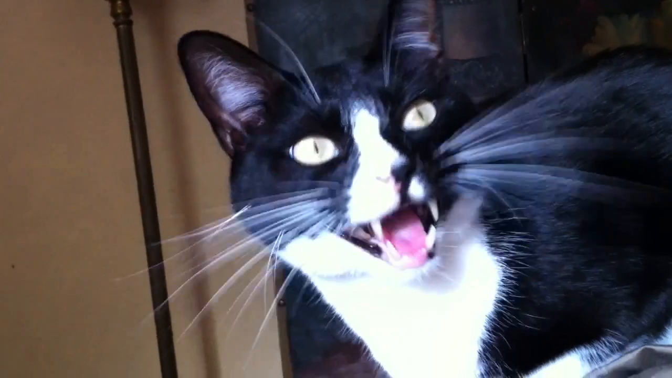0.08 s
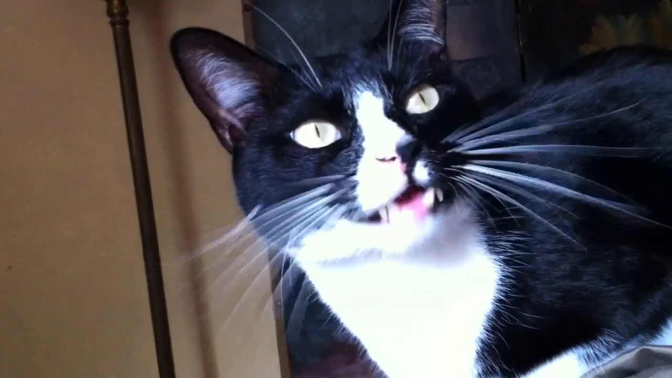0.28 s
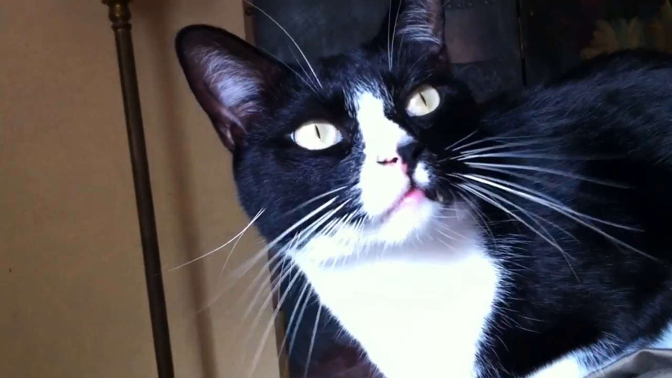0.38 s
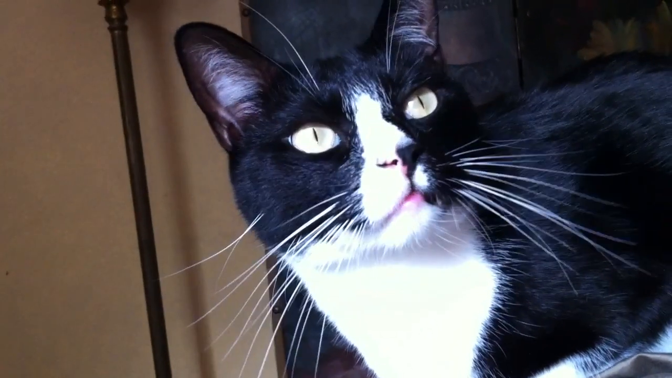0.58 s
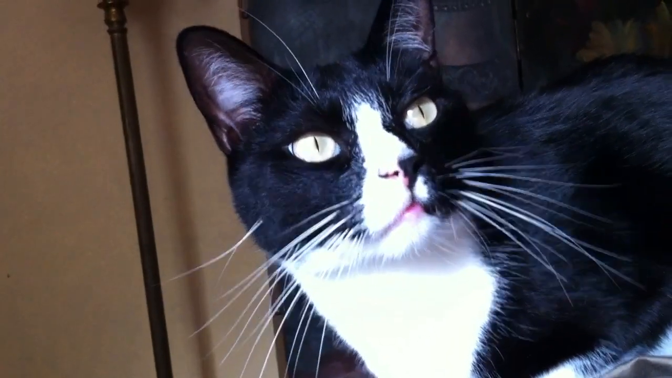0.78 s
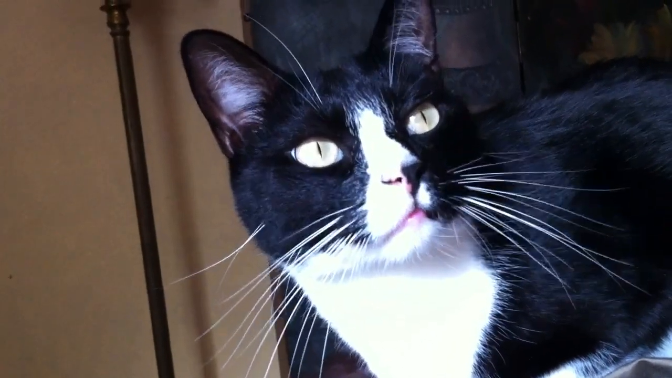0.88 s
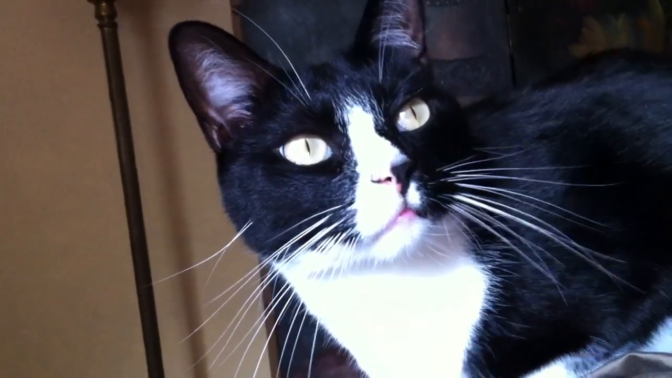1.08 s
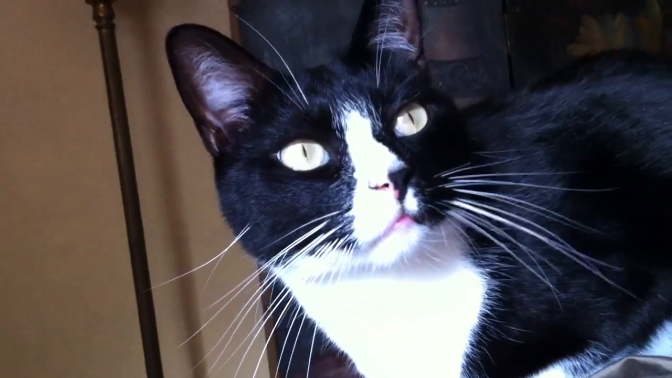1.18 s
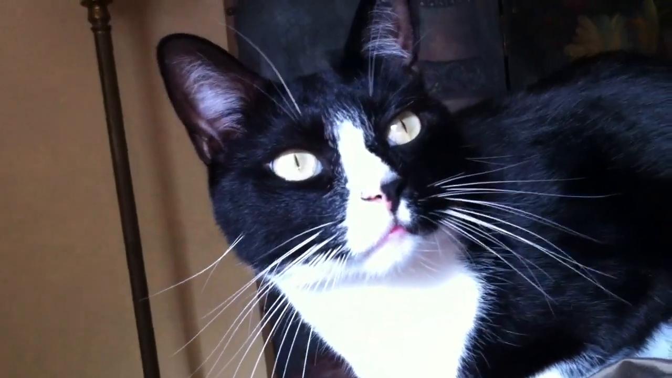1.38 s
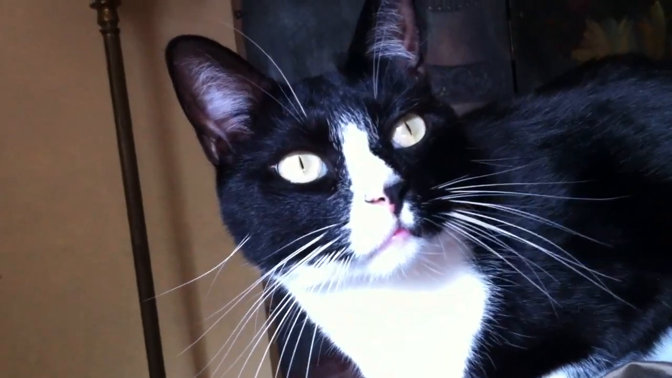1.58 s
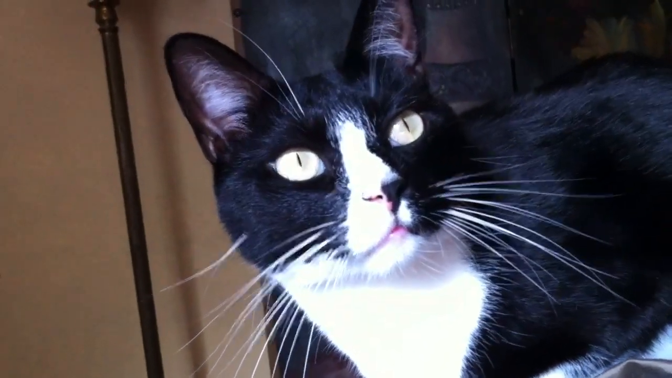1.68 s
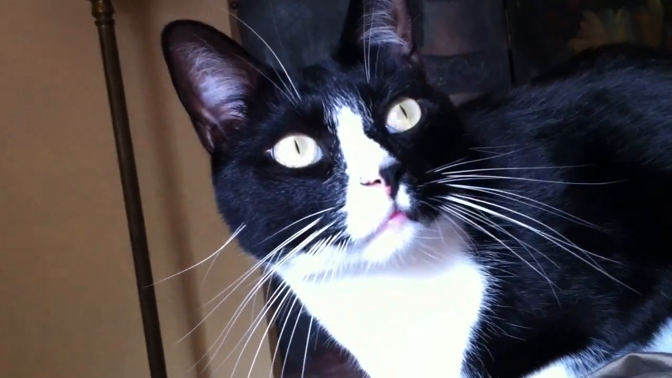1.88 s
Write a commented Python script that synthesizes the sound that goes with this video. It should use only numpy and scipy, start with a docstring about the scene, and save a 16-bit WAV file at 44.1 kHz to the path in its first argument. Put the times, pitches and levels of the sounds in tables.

```python
"""A faint steady hum and hiss come first; then a cat close by in a small quiet room gives one meow.
The meow is a sum of harmonics on one pitch: a squeaky start, a bright open cry with doubled cycles shaped
by throat resonances, a rasp as the jaw closes, then a thin wavering coo. Bursts of coloured noise make
the gurgles and a lip smack. A tiny rising squeak follows, a short glide of one line. Last comes a soft
purr: regular beats that ring decaying chest modes over a low noise rumble."""
import sys
import numpy as np
from scipy import signal
from scipy.fft import rfft, irfft
from scipy.io import wavfile

SR = 44100
rng = np.random.default_rng(int(sys.argv[2]) if len(sys.argv) > 2 else 0)


def transcribe(signal):
    """Save signal, clipped to [-1, 1], as a 16-bit WAV file at the path in sys.argv[1]."""
    frames = np.atleast_2d(signal).T
    limited = np.clip(frames, -1, 1)
    pcm = np.round(limited * 32767).astype(np.int16)
    wavfile.write(sys.argv[1], SR, pcm)


N = 83790
T = np.arange(N) / SR   # time, s


def from_db(db):
    """A level in decibels is twenty times the logarithm of the amplitude ratio returned here."""
    return 10 ** (np.asarray(db) / 20)


def rms_one(x):
    """Division by the root mean square gives a signal unit power."""
    return x / np.sqrt(np.mean(np.abs(x) ** 2) + 1e-20)


def in_time(rows):
    """Linear interpolation turns each column after the times into a curve through time."""
    times, *columns = np.transpose(rows)
    return [np.interp(T, np.sort(times), column) for column in columns]


def drift(hz):
    """White noise through a two-pole low-pass wanders at about this rate, with unit power."""
    pole = np.exp(-2 * np.pi * hz / SR)
    white = rng.standard_normal(2 * N)
    wander = signal.lfilter([1], [1, -2 * pole, pole * pole], white)
    return rms_one(wander[N:])   # the first half lets the filter settle


def noise(spectrum):
    """Spectral shaping of white noise: levels run straight over log frequency, at unit power overall."""
    hz, db = np.transpose(spectrum)
    log_hz = np.log(np.fft.rfftfreq(N, 1 / SR) + 1)
    gain = from_db(np.interp(log_hz, np.log(hz), db))
    return rms_one(irfft(rfft(rng.standard_normal(N)) * gain, N))


def partial(phase, rough):
    """Turbulence modulates a line's amplitude and phase at random, which spreads it into sidebands."""
    fray_rate_hz = 113
    fray = drift(fray_rate_hz) + 1j * drift(fray_rate_hz)
    return np.exp(1j * phase) * (1 + rough * fray) / np.sqrt(1 + 2 * rough ** 2)


def background(waver_hz=7):
    """Random modulation makes a pure hum waver; broadband noise adds the room noise and hiss."""
    hum_hz, hum_db, hum_waver = 261.5, -69.5, 0.25
    floor_db = -65
    # room noise and hiss: f/Hz, relative spectral density/dB
    floor_spectrum = [(25, 0), (45, -10), (65, -9), (95, -14), (125, -5), (190, -6.5), (290, 1),
                      (400, -7.5), (700, -10), (1100, -12), (1800, -13.5), (4000, -16), (8000, -18.5),
                      (15500, -20)]
    waver = 1 + hum_waver * (drift(waver_hz) + 1j * drift(waver_hz))
    hum = (np.exp(2j * np.pi * hum_hz * T) * waver).real
    return from_db(hum_db) * rms_one(hum) + from_db(floor_db) * noise(floor_spectrum)


def purr(uneven_db=5.0):
    """Impulse excitation: regular beats set off decaying chest modes over a swelling rumble."""
    start_s, period_s = 1.467, 0.053
    rumble_db = -68.5   # before the swell
    # swell of the whole purr: t/s, gain/dB
    swell = [(.9, -18), (1.15, -0.5), (1.4, -7), (1.47, -5.5), (1.55, 4), (1.63, 1), (1.71, 2.5), (1.76, 2),
             (1.83, 2), (1.9, 2)]
    # chest modes: f/Hz, mean level before the swell/dB, decay time to -60 dB/s
    chest_modes = [(128, -66, 0.16), (202, -63.5, 0.02), (320, -61, 0.0166), (470, -68, 0.016)]
    # rumble: f/Hz, relative level/dB
    rumble_spectrum = [(50, -35), (100, -19), (124, 6.5), (145, -3), (200, -4), (330, -7.5), (550, -19),
                       (1200, -44), (3000, -41)]
    swell_db, = in_time(swell)
    beats = np.zeros(N)
    for beat_s in np.arange(start_s, T[-1], period_s):
        age = np.maximum(T - beat_s, 0)
        for hz, level_db, t60 in chest_modes:
            decay_db = 60 * np.minimum(age / t60, 2)
            strike_db = level_db + uneven_db * rng.standard_normal()
            beats += from_db(strike_db - decay_db) * np.sin(2 * np.pi * hz * age)
    return from_db(swell_db) * (beats + from_db(rumble_db) * noise(rumble_spectrum))


def squeak():
    """Linear frequency glide: a phase quadratic in time gives a tiny rising after-sound."""
    centre_s, length_s, level_db = 1.04, 0.051, -68   # length: half-width to 1/e
    centre_hz, rise_hz_per_s = 792, 4400
    age = T - centre_s
    phase = 2 * np.pi * (centre_hz + rise_hz_per_s * age / 2) * age
    envelope = np.exp(-(age / length_s) ** 2)
    return from_db(level_db) * envelope * partial(phase, rough=.5).real


def mouth_noises():
    """Turbulent flow: enveloped noises form the throat's air rush, short gurgles and a lip smack."""
    smack_s, smack_decay_s, smack_db = .8605, 0.0047, -48.5   # decay to 1/e; level at onset
    # air rushing through the throat: t/s, level/dB
    air_levels = [(.42, -90), (.46, -63), (.53, -65), (.61, -76), (.68, -63), (.72, -61.5), (.78, -63.5),
                  (.85, -62.5), (.9, -71), (1.0, -78.5), (1.12, -90)]
    # colour of the air rush: f/Hz, relative level/dB
    air_spectrum = [(100, -38), (500, -18.5), (900, 0), (1200, -8), (1450, -1.5), (1750, -9), (2100, -3),
                    (2900, -19.5), (5000, -16.5), (8000, -22)]
    # gurgles in the throat: centre t/s, half-width to 1/e^2/s, peak level/dB
    gurgle_bursts = [(0.662, 0.0086, -56), (0.801, .008, -52.5), (0.818, 0.016, -58), (0.845, 0.016, -55)]
    # colour of the gurgles: f/Hz, relative level/dB
    gurgle_spectrum = [(100, -24), (330, -6.5), (550, -17), (850, 0.5), (1000, -0.5), (1250, -27),
                       (2400, -37), (5000, -25), (9000, -42)]
    # colour of the smack: f/Hz, relative level/dB
    smack_spectrum = [(100, -30), (300, -7), (1400, -12), (2450, 7), (3000, -33), (3700, 3.5), (4300, -14),
                      (5200, 4), (7000, -17), (12000, -30)]
    air_db, = in_time(air_levels)
    air = from_db(air_db) * noise(air_spectrum)
    bursts = sum(from_db(db) * np.exp(-2 * ((T - s) / length) ** 2) for s, length, db in gurgle_bursts)
    gurgles = bursts * noise(gurgle_spectrum)
    smack_decay = (T > smack_s) * np.exp(-np.abs(T - smack_s) / smack_decay_s)
    smack = from_db(smack_db) * smack_decay * noise(smack_spectrum)
    return air + gurgles + smack


def coo(phase, fray_per_harmonic=0.93):
    """Harmonic series: a nearly pure tone through the nearly shut mouth, with weak, frayed overtones."""
    second_boost_db, boost_fade_s, boost_start_s = 11.5, 0.029, 0.505
    treble_fade_start_s, treble_fade_db_per_s = 0.64, 88
    # the whole coo: t/s, level/dB, roughness of the first harmonic (0-1)
    course = [(.46, -68, 0.1), (.49, -50, 0), (.535, -50, 0.13), (.616, -48.5, 0), (.636, -52.5, 0.15),
              (.668, -49.5, .08), (.684, -55, 0.1), (.71, -52, 0.17), (.752, -52.5, 0.13), (.768, -56, .15),
              (.79, -58, 0.2), (.803, -67, .6), (.826, -50.5, 0.4), (.84, -71, 0.82), (.853, -54, 0.8),
              (.868, -88, 0.56)]
    # harmonics from the first up: relative level/dB
    harmonics_db = [0.5, -13, -20.5, -27.5, -28, -26, -18.5, -27, -28]
    # weak line between harmonics one and two: t/s, relative level/dB
    half_line = [(.5, -27), (.54, -9.5), (.59, -25), (.7, -28), (.79, -21), (.85, -5)]
    db, rough = in_time(course)
    half_db, = in_time(half_line)
    # as the effort wanes, the fourth harmonic and up fade
    waning = from_db(-treble_fade_db_per_s * np.maximum(T - treble_fade_start_s, 0))
    sizes = [from_db(level) * (waning if k > 2 else 1) for k, level in enumerate(harmonics_db)]
    # the closing mouth still lifts the second harmonic
    boost = np.exp(-np.maximum(T - boost_start_s, 0) / boost_fade_s)
    sizes[1] = sizes[1] * from_db(second_boost_db * boost)
    out = 0
    for k, size in enumerate(sizes):
        out = out + size * partial((k + 1) * phase, rough * (1 + fray_per_harmonic * k)).real
    out = out + from_db(half_db) * partial(phase + phase / 2, rough=0.81).real
    power = sum(size ** 2 for size in sizes) / 2
    return from_db(db) * out / np.sqrt(power)


def flutter(uneven=0.24):
    """Amplitude modulation: uneven beats of the vocal folds rasp the voice as the jaw closes."""
    centre_s, length_s, mean_hz, depth = 0.45, 0.032, 78.3, 0.33
    beat_hz = mean_hz * (1 + uneven * drift(mean_hz))
    beat = np.cos(2 * np.pi * np.cumsum(beat_hz) / SR)
    return 1 + depth * np.exp(-((T - centre_s) / length_s) ** 4) * beat


def cry(pitch, phase, low_cut_hz=480, fray_hz=3000):
    """Period doubling puts lines at half the pitch; source-filter resonances sink as the jaw closes."""
    # the open cry: t/s, level/dB, relative strength of the half-pitch lines (0-1),
    # roughness at low frequency (0-1)
    course = [(.195, -80, .1, .3), (.199, -44, 0.1, 0.1), (.214, -47.5, 0.2, .12), (.223, -42.5, 0.2, 0.17),
              (.244, -46, 0.3, 0.3), (.248, -35.5, 0.54, 0.14), (.255, -32, 1, 0.12), (.26, -34, 0.97, 0.2),
              (.28, -36, 0.93, 0.13), (.345, -35.5, 0.9, 0.09), (.385, -40, 0.92, 0.09),
              (.405, -37.5, 1, 0.1), (.425, -43.5, 1, 0.16), (.435, -41.5, 0.99, 0.4),
              (.483, -49.5, 0.99, 0.42), (.492, -64, 0.4, 0.54), (.53, -87, 0.3, .3)]
    # opening of the mouth: t/s, opening (0 shut, 1 wide)
    mouth_opening = [(.2, 1.01), (.255, 0.98), (.28, 0.907), (.335, 0.775), (.37, .74), (.4, 0.47),
                     (.42, 0.4), (.44, 0.2), (.46, .1), (.49, 0.1)]
    # throat and mouth resonances: f shut/Hz, f wide/Hz, width/Hz, level shut/dB, level wide/dB
    throat_modes = [(676, 695, 470, -12.5, -9.5), (940, 1580, 444, -1, -12.5), (1300, 2376, 244, 6.5, 6.5),
                    (1880, 2694, 310, -17, 0), (3080, 3210, 620, -16, -1.5), (3930, 4690, 500, -13, -15.5),
                    (4600, 5300, 930, -24.5, -32.5)]
    # hollows between the resonances of the wide-open mouth: f/Hz, width/Hz, depth (0-1)
    hollows = [(1840, 140, .75), (3920, 190, 0.3), (5400, 190, 0.7)]
    db, half, rough = in_time(course)
    mouth, = in_time(mouth_opening)
    throat = []
    for shut, wide, width, db_shut, db_wide in throat_modes:
        centre = shut + (wide - shut) * mouth
        gain = from_db(db_shut + (db_wide - db_shut) * mouth)
        throat.append((centre, width, gain))
    hollow = np.clip(4 * (mouth - .5), 0, 1)
    out, power = 0, 0
    for k in range(1, 22):   # odd k: lines between the harmonics of the pitch
        hz = k * pitch / 2
        rings = [(gain, 1 / (1 + 2j * (hz - centre) / width)) for centre, width, gain in throat]
        size = sum(gain * np.abs(ring) ** 2 for gain, ring in rings)
        size = size / (1 + (low_cut_hz / hz) ** 6) * (half if k % 2 else 1)
        for centre, width, depth in hollows:
            size = size * (1 - hollow * min(depth, 1) / (1 + (2 * (hz - centre) / width) ** 2))
        # neighbouring resonances add with alternating sign
        lag = np.angle(sum((-1) ** i * gain * ring for i, (gain, ring) in enumerate(rings)))
        line = partial(k * phase / 2 + lag, rough * (1 + (hz / fray_hz) ** 2))
        out = out + size * line.real
        power = power + size ** 2 / 2
    return from_db(db) * out / np.sqrt(power)


def meow():
    """Phase is the integral of frequency: one slightly unsteady pitch carries the cry and the coo."""
    jitter, jitter_hz = 0.0035, 65.5   # relative spread of the pitch, rate
    start_s, end_s, ramp_s = .194, .875, 0.0033
    # mean pitch of the voice: t/s, f/Hz
    pitch_course = [(.197, 811), (.206, 727), (.215, 663), (.222, 831), (.229, 886), (.238, 763),
                    (.247, 749), (.256, 655.8), (.272, 615.4), (.332, 596.5), (.385, 590.6), (.41, 600.7),
                    (.44, 625), (.49, 669.2), (.534, 701.5), (.588, 702.5), (.6, 676), (.616, 735.6),
                    (.636, 697), (.668, 697), (.684, 661.6), (.71, 705.3), (.752, 705.3), (.768, 663.5),
                    (.786, 699), (.86, 721)]
    pitch, = in_time(pitch_course)
    pitch = pitch * (1 + jitter * drift(jitter_hz))
    phase = 2 * np.pi * np.cumsum(pitch) / SR
    sounding = np.clip(np.minimum(T - start_s, end_s - T) / ramp_s, 0, 1)
    return sounding * (flutter() * cry(pitch, phase) + coo(phase))


def room(x):
    """Diffuse reverberation: convolution with decaying noise gives a furnished room's short reflections."""
    t60_s, level_db, delay_s = 0.14, -12.5, 0.0034
    decay = np.exp(-np.log(1000) * T / t60_s) * (T > delay_s)
    tail = rng.standard_normal(N) * decay
    return from_db(level_db) * signal.fftconvolve(x, tail / np.linalg.norm(tail))[:N]


def scene():
    """Superposition: the voice and its reflections add to the purr and the background."""
    voice = meow() + mouth_noises() + squeak()
    return (voice + room(voice) + purr() + background())[None]


def record(dry):
    """Band limiting: the small microphone drops the deep bass, and the top is cut steeply."""
    low_cut_hz, top_cut_hz = 96, 15800
    bass_cut = signal.butter(4, low_cut_hz, "high", fs=SR, output="sos")
    top_cut = signal.ellip(10, .1, 70, top_cut_hz, fs=SR, output="sos")   # ripple, stop band: dB
    thin = signal.sosfilt(bass_cut, dry)
    return signal.sosfilt(top_cut, thin)


dry = scene()
out = record(dry)
transcribe(out)
```